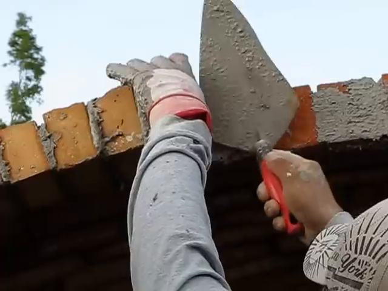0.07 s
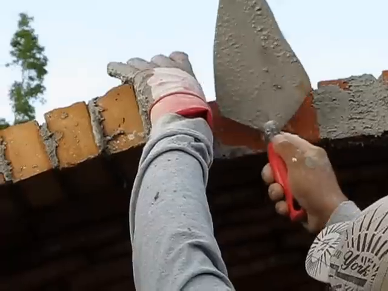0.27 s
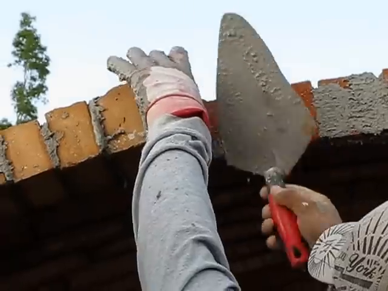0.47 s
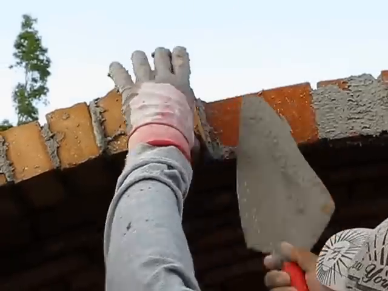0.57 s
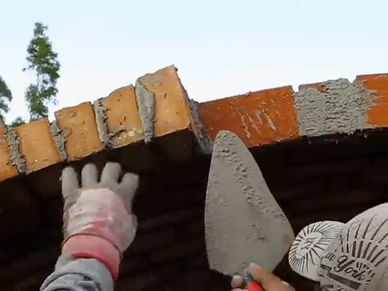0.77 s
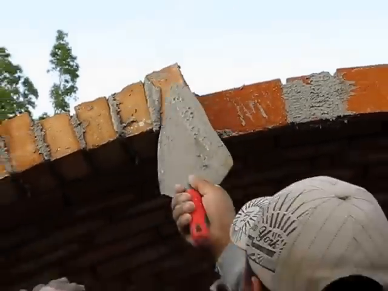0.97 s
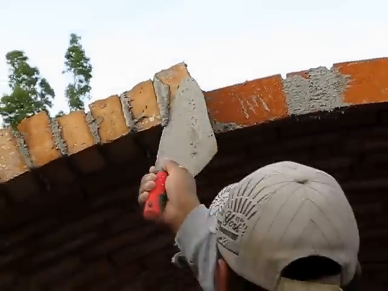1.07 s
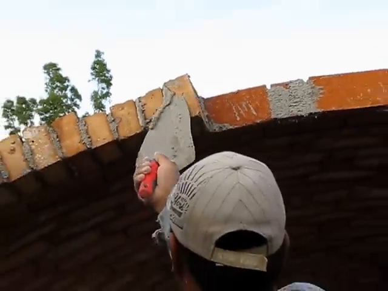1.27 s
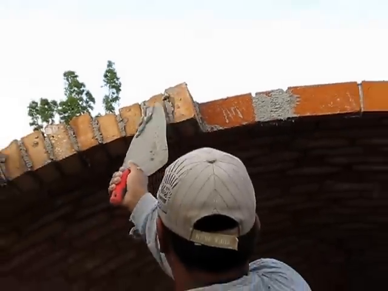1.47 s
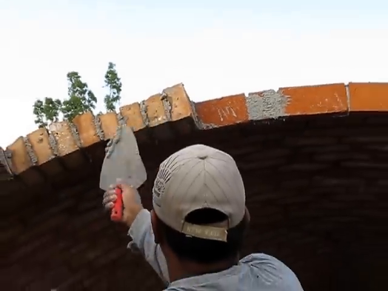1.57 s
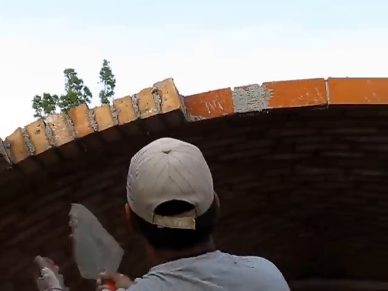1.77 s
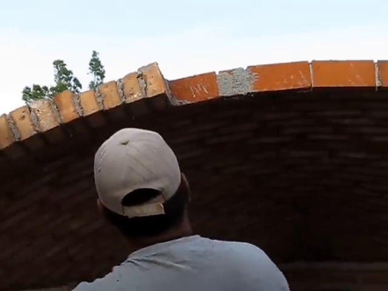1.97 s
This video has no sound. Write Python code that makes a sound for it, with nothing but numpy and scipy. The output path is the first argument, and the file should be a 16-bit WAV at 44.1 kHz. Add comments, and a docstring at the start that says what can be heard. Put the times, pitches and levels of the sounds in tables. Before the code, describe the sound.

Steel trowel knocks a brick with ringing clinks, then scrapes gritty mortar off the masonry edge

```python
"""Trowel and brick under a vault

A bricklayer knocks a brick home with a steel trowel at the rim of a brick vault, then scrapes the joint clean.
Blows are shaped noise bands over booming masonry modes; the blade is a bank of resonators, struck and rubbed.
Dense random clicks make the sand rasp and the patter of mortar; rough tones squeal, noise bursts tick and bump.
Distant site noise, a swelling hum and a thin whine lie behind."""
import sys
import numpy as np
from scipy import signal
from scipy.io import wavfile

SR = 44100
rng = np.random.default_rng(int(sys.argv[2]) if len(sys.argv) > 2 else 0)


def unload_wav(signal):
    """Save mono or channel-first audio to the path in sys.argv[1] as 16-bit WAV at rate SR, clipped to [-1, 1]."""
    wavfile.write(
        sys.argv[1],
        SR,
        np.round(np.clip(np.atleast_2d(signal).T, -1, 1) * 32767).astype(np.int16),
    )


N = 88464
T = np.arange(N) / SR
EDGES_HZ = np.geomspace(25, 17500, 25)
CENTRES_HZ = np.sqrt(EDGES_HZ[1:] * EDGES_HZ[:-1])


def amp(db):
    """Decibels to amplitude ratio."""
    return 10 ** (np.asarray(db) / 20)


def rms_one(x):
    """Scale to rms 1 over all channels."""
    return x / np.sqrt(np.mean(x ** 2) + 1e-20)


def at_hz(points, hz):
    """Read a (f/Hz, value) table, linear in log frequency."""
    points = np.array(points)
    return np.interp(np.log(hz), np.log(points[:, 0]), points[:, 1])


def in_time(points):
    """Read a (t/s, value) table at every sample."""
    return np.interp(T, *np.transpose(points))


def pan(db):
    """Stereo gains with the left db above the right."""
    return amp(np.array([[.5], [-.5]]) * db)


def fade(start_s, t60_s):
    """Zero before the start, then an exponential decay."""
    return (T >= start_s) * amp(-60 * np.clip((T - start_s) / t60_s, 0, 4))


def drift(knots_per_s):
    """Smooth random curve of rms 1."""
    knots = rng.standard_normal(int(N / SR * knots_per_s) + 2)
    return rms_one(np.interp(T * knots_per_s, np.arange(len(knots)), knots))


def grains(per_s, spread_db, size=(2, 2, N)):
    """Random clicks of uneven size and either sign; rms 1."""
    sizes = amp(spread_db * np.minimum(rng.exponential(1, size), 5))
    sizes = sizes * rng.choice([-1, 1], size)
    return rms_one(sizes * (rng.random(size) < per_s / SR))


# stereo width: f/Hz, side minus mid/dB
WIDTH = [(60, -25), (250, -20.5), (500, -15.5), (1000, -10), (2000, -7), (4000, -2), (12000, -0.5)]
# stereo balance: f/Hz, left minus right/dB
LEAN = [(60, -1.5), (300, -1.5), (1100, -2), (2000, -3), (4000, 3.5), (8000, -3), (14000, -2.5)]


def bands(source):
    """Split four streams into stereo bands of unit power per Hz, wider towards the treble."""
    out = []
    for k, hz in enumerate(CENTRES_HZ):
        band_pass = signal.butter(2, EDGES_HZ[k:k + 2], "band", fs=SR, output="sos")
        # neighbouring bands use different pairs of streams
        mid, side = signal.sosfilt(band_pass, source[k % 2] + 1e-18)
        width = amp(at_hz(WIDTH, hz))
        stereo = mid + width * side * [[1], [-1]]
        out.append(stereo * pan(at_hz(LEAN, hz)) * np.sqrt(SR / 2 / (1 + width ** 2)))
    return np.array(out)


def noise_bands():
    """White noise split into stereo bands."""
    return bands(rng.standard_normal((2, 2, N)))


def colour(split, spectrum):
    """Mix bands to a spectrum; rms 1."""
    return rms_one(np.tensordot(amp(at_hz(spectrum, CENTRES_HZ)), split, 1))


def ring(drive, hz, t60_s):
    """Two-pole resonator: a unit click sets a tone of height 1 ringing."""
    radius, step_rad = amp(-60 / (t60_s * SR)), 2 * np.pi * hz / SR
    poles = [1, -2 * radius * np.cos(step_rad), radius * radius]
    return signal.lfilter([.5, 0, -.5], poles, drive + 1e-18)


def decaying(impulses, t60_s):
    """One-pole smoother: each impulse dies away exponentially."""
    return signal.lfilter([1], [1, -amp(-60 / (t60_s * SR))], impulses + 1e-18)


def clicks(times_s, db):
    """Single-sample clicks at the given times."""
    out = np.zeros(N)
    out[(times_s * SR).astype(int)] = amp(db)
    return out


def place(tone, hz):
    """A tone reaches the two microphones out of step, by a phase that grows with its pitch."""
    phase_rad = 2 * np.arctan(amp(at_hz(WIDTH, hz)))
    lag = int(phase_rad / (2 * np.pi * hz) * SR + .5)
    return np.array([tone, np.pad(tone, (lag, 0))[:N]]) * pan(at_hz(LEAN, hz))


# blows: t/s, blade ring level/dB, share on blade edge 0-1, then relative knock level/dB per Hz at each KNOCK_HZ
BLOWS = [(0.094, -18.5, 0.97, -55, -51, -56.5, -57, -76, -63.5, -95, -90),
         (0.3823, -15.5, 0.29, -54.5, -53.5, -52, -52.5, -65.5, -74.5, -80.5, -106),
         (0.589, -34, .2, -74, -70, -62, -59.5, -67, -72, -99, -110),
         (0.619, -38, 0.33, -54, -43.5, -47.5, -52.5, -53.5, -61, -75.5, -95)]
# frequencies of the knock levels: f/Hz
KNOCK_HZ = [170, 400, 750, 1200, 2100, 4000, 7000, 13000]
# vault reverberation: f/Hz, t60/s
VAULT_T60 = [(100, 0.45), (260, 0.66), (700, 0.39), (1840, 0.32), (4850, 0.13), (12000, 0.14)]
KNOCK_LOW_HZ, KNOCK_TOP_HZ = 140, 14000   # the knock falls away outside these
KNOCK_ATTACK_S, KNOCK_RISE_CYCLES, KNOCK_T60_S = .001, 1.8, 0.28
TAIL_DB, CRACK_DB, CRACK_T60_S = 2.5, 12, 0.024
KNOCK_GRIT_DB, KNOCK_GRIT_PER_S = 0.5, 330   # mortar crumbles unevenly under the blow


def knocks():
    """Each blow: short crack, dense knock and vault tail, summed as power in each noise band."""
    out = np.zeros((2, N))
    for hz, noise in zip(CENTRES_HZ, noise_bands()):
        crack = amp(CRACK_DB) * fade(0, CRACK_T60_S) * hz / (hz + 3000)
        tail = amp(TAIL_DB) * fade(0, at_hz(VAULT_T60, hz))
        power = fade(0, KNOCK_T60_S) ** 2 + tail ** 2 + crack ** 2
        power *= np.minimum(T / (KNOCK_ATTACK_S + KNOCK_RISE_CYCLES / max(hz, 400)), 1)
        power /= (1 + (KNOCK_LOW_HZ / hz) ** 4) * (1 + (hz / KNOCK_TOP_HZ) ** 4)
        total = np.zeros(N)
        for t_s, _, _, *levels_db in BLOWS:
            start = int(t_s * SR)
            level_db = np.interp(np.log(hz), np.log(KNOCK_HZ), levels_db)
            total[start:] += power[:N - start] * amp(level_db) ** 2
        out += noise * np.sqrt(total)
    return out * amp(KNOCK_GRIT_DB * drift(KNOCK_GRIT_PER_S))


# low masonry and vault modes: f/Hz, level re the blow's lowest knock level/dB, t60/s
VAULT_MODES = [(138, 14, 3.2), (211, 22, 1.13), (277.3, 25.5, 0.72), (301.6, 24, 0.79), (380.2, 22, .45),
               (482, 14, 0.32), (538, 0, 0.25), (576, 22, .5), (645, 10, 0.22)]


def vault():
    """The weight of each blow sets the low resonances booming."""
    t_s, _, _, weight_db = np.transpose(BLOWS)[:4]
    return sum(place(ring(clicks(t_s, weight_db + db), hz, t60_s), hz) for hz, db, t60_s in VAULT_MODES)


# grinding force of blade on brick: t/s, relative level/dB
GRIND = [(0.51, -50), (0.56, -34.5), (0.61, -33), (0.7, -43.5), (0.81, -36), (0.84, -49), (0.982, -64.5),
         (0.993, -26.5), (1.04, -28), (1.078, -26.5), (1.12, -35), (1.21, -28.5), (1.3, -29.5),
         (1.355, -34.5), (1.45, -23.5), (1.5, -31.5), (1.595, -25.5), (1.66, -35), (1.73, -44.5),
         (1.89, -43), (1.94, -37), (2.0, -39.5)]


def grinding():
    """Force envelope of the scrape, shared by steel and sand; zero before its first point."""
    return amp(in_time(GRIND)) * (T > GRIND[0][0])


SNAGS_PER_S, SNAG_SPREAD_DB = 120, 1.1   # grains that pluck any one mode
CONTACT_WAVER_DB, CONTACT_WAVER_PER_S = 5.5, 22   # the moving contact favours one mode, then another


def rubbing(grind, t60_s):
    """Sand grains pluck a mode at random; the moving contact now and then mutes it."""
    contact = grind * amp(CONTACT_WAVER_DB * np.minimum(drift(CONTACT_WAVER_PER_S), .5))
    # offset the power that longer rings accumulate
    gain = np.sqrt(2 * np.log(1e6) / (t60_s * SR))
    return grains(SNAGS_PER_S, SNAG_SPREAD_DB, size=N) * contact * gain


# trowel modes: f/Hz, relative level/dB struck on edge, struck on heel, scraped; t60/s
BLADE = [(878, -1.5, -5, -11.5, 0.17), (937, -12.5, -11, -8.5, 0.32), (1118, -4.5, 0, -6, 0.4),
         (1223, 10, -8, -13, 0.054), (1313, 0.5, -24, -27, 0.22), (1374, -6, -20, -9.5, 0.4),
         (1850, -7.5, -39, -8, 0.1), (1980, -23, -16, -9, 0.14), (2465, -9, -13.5, -11.5, 0.12),
         (3016, -9, -10, -24, 0.067), (3100, -9.5, -66, -7.5, 0.21), (3490, -2.5, -70, -12, 0.04),
         (3873, -0.5, -26, -9, 0.073), (6150, -38, -59, -28, .15), (7080, -37, -17, -23, 0.072),
         (8900, -9, -43, -19.5, 0.032)]
# blade catches on the brick edge: t/s, click level/dB, relative ring level/dB
CATCHES = [(0.993, -46, -27.5), (1.052, -44, -30), (1.078, -27.5, -56), (1.137, -27, -60),
           (1.447, -35, -30), (1.518, -28, -25.5), (1.646, -29.5, -30.5)]
GRIND_RING_DB = -9.5
RING_BUILD_S = 0.002   # the ring swells as the nearest walls answer
PRESSED_T60_SHARE = .45   # pressed against the brick, the blade rings for less time


def blade(grind):
    """Steel modes ring from blows, catches and the sand passing under the blade."""
    t_s, ring_db, edge = np.transpose(BLOWS)[:3]
    catch_s, _, catch_db = np.transpose(CATCHES)
    edge, out = np.clip(edge, 0, 1), 0
    for hz, edge_db, heel_db, scraped_db, t60_s in BLADE:
        struck = clicks(t_s, ring_db + edge * edge_db + (1 - edge) * heel_db)
        struck = ring(struck, hz, RING_BUILD_S * np.log(1000)) * 2 / (RING_BUILD_S * SR)
        pressed_t60_s = t60_s * PRESSED_T60_SHARE
        rubbed = rubbing(grind, pressed_t60_s) * amp(GRIND_RING_DB + scraped_db)
        rubbed = rubbed + clicks(catch_s, catch_db + scraped_db)
        out = out + place(ring(struck, hz, t60_s) + ring(rubbed, hz, pressed_t60_s), hz)
    return out


# scrape treble against its body: t/s, relative level/dB
TREBLE = [(0.55, -17), (0.8, -24), (0.87, 9), (1.0, 3), (1.14, 0.5), (1.25, 3), (1.4, -9.5), (1.6, 3),
          (1.72, -14), (1.93, 8), (2.0, 12.5)]
UPPER_LOW_HZ, UPPER_TOP_HZ, UPPER_T60_S = 2610, 13400, 0.13
UPPER_STRUCK_DB, UPPER_HEEL_DB, UPPER_RUBBED_DB, UPPER_CAUGHT_DB = -17.5, -23, -22.5, -13.5
UPPER_TILT_DB_PER_OCT = -7


def shimmer(grind, count=56):
    """Randomly scattered upper blade modes, with random levels at each microphone."""
    t_s, ring_db, edge = np.transpose(BLOWS)[:3]
    catch_s, _, catch_db = np.transpose(CATCHES)
    hits = clicks(t_s, ring_db + UPPER_STRUCK_DB + (1 - edge) * UPPER_HEEL_DB)
    hits = hits + clicks(catch_s, catch_db + UPPER_CAUGHT_DB)
    bright_grind = grind * amp(in_time(TREBLE))
    out = 0
    for hz in np.linspace(UPPER_LOW_HZ, UPPER_TOP_HZ, count) + rng.normal(0, 70.7, count):
        rubbed = rubbing(bright_grind, UPPER_T60_S) * amp(UPPER_RUBBED_DB)
        level_db = UPPER_TILT_DB_PER_OCT * np.log2(hz / UPPER_LOW_HZ) + rng.normal(0, 1.4, (2, 1))
        out = out + place(ring(hits + rubbed, hz, UPPER_T60_S), hz) * amp(level_db)
    return out


SQUEAL_ATTACK_S, SQUEAL_T60_S = 0.0078, .2


def rough_tone(t_s, length_s, db, hz, sag_hz_per_s, pan_db, width_hz):
    """A randomly modulated tone that sags in pitch for up to 0.15 s and dies away after its length."""
    phase = 2 * np.pi * np.cumsum(hz - sag_hz_per_s * np.clip(T - t_s, 0, .15)) / SR
    tone = rms_one(drift(width_hz) * np.cos(phase) + drift(width_hz) * np.sin(phase))
    held = np.clip((T - t_s) / SQUEAL_ATTACK_S, 0, 1) * (T < t_s + length_s)
    envelope = held + fade(t_s + length_s, SQUEAL_T60_S)
    return place(tone * envelope * amp(db), hz) * pan(pan_db - at_hz(LEAN, hz))


# squeals: t/s, length/s, level/dB, start f/Hz, sag/Hz per s, pan/dB
SQUEALS = [(1.046, 0.011, -26, 3900, 503, 4), (1.073, 0.0093, -30, 3880, 1002, 7),
           (1.213, 0.0067, -31, 4100, 964, 5), (1.432, 0.0071, -30.5, 4450, 997, 6),
           (1.518, .008, -32, 2500, 0, -4), (1.58, 0.028, -38, 3000, 0, -5),
           (1.638, 0.013, -27.5, 3800, 2000, 4.5), (1.95, 0.014, -40, 4480, 0, 2)]


def squeals():
    """The blade sticks and slips in short rough squeals."""
    return sum(rough_tone(*row, width_hz=520) for row in SQUEALS)


STUTTER_DB, STUTTER_PER_S, STUTTER_T60_S = -10.5, 28, 0.016


def stutter():
    """The blade jumps from grain to grain: sudden pressure surges that die quickly; rms 1."""
    jumps = (rng.random(N) < STUTTER_PER_S / SR) * rng.random(N)
    return rms_one(1 + amp(STUTTER_DB) * rms_one(decaying(jumps, STUTTER_T60_S)))


# rasp colour: f/Hz, relative level/dB per Hz
GRIND_SPECTRUM = [(300, -32), (700, -6), (1100, -1), (1600, -6.5), (2500, -2), (4000, -2.5), (6500, -2.5),
                  (10000, -10.5), (15500, -16.5)]
GRIND_DB, GRIND_FLUTTER_DB, GRAINS_PER_S, GRAIN_SPREAD_DB = -6, 1, 7000, 3.2
# big grains crushed under the blade
COARSE_PER_S, COARSE_SPREAD_DB, COARSE_DB, COARSE_T60_S = 150, -1, -7.5, 0.008
TREBLE_FROM_HZ, RASP_PATCHY_DB, CATCH_T60_S = 6500, 2.0, 0.14


def rasp(grind):
    """Fine and coarse sand cracks under the juddering blade, bursts at catches; colour shifts with contact."""
    crush = decaying(np.abs(grains(COARSE_PER_S, COARSE_SPREAD_DB, size=N)), COARSE_T60_S)
    coarse = amp(COARSE_DB) * rms_one(crush) * rng.standard_normal((2, 2, N))
    split = bands(grains(GRAINS_PER_S, GRAIN_SPREAD_DB) + coarse)
    split[CENTRES_HZ > TREBLE_FROM_HZ] *= amp(in_time(TREBLE))
    split *= np.array([[amp(RASP_PATCHY_DB * drift(70))] for _ in CENTRES_HZ])
    bursts = sum(amp(db) * fade(t_s, CATCH_T60_S) for t_s, db, _ in CATCHES)
    pressure = amp(GRIND_DB + GRIND_FLUTTER_DB * drift(150)) * grind * stutter()
    return colour(split, GRIND_SPECTRUM) * np.hypot(pressure, bursts)


# mortar showers: t/s, length/s, patter level/dB, thud level/dB
SHOWERS = [(0.694, .03, -34.5, -59), (0.838, 0.034, -24.5, -38), (1.052, 0.076, -40, -36.5),
           (1.352, 0.056, -25.5, -30.5), (1.436, 0.035, -33, -35.5), (1.52, 0.043, -37, -56),
           (1.582, 0.093, -33, -41.5), (1.96, 0.036, -34.5, -36)]
# patter colour: f/Hz, relative level/dB per Hz
PATTER = [(150, -11), (400, -3.5), (1000, 5), (2200, 2), (4200, -6), (7000, -18), (15000, -34)]
# thud colour: f/Hz, relative level/dB per Hz
THUD = [(50, -11), (130, -11), (250, -0.5), (450, -6.5), (900, -22), (4000, -53)]
SHOWER_ATTACK_S, SHOWER_T60_S, THUD_T60_S = 0.035, .3, 0.82
CRUMBS_PER_S, CRUMB_SPREAD_DB = 5000, 2


def mortar():
    """Loose mortar lands as a patter of crumbs over a soft thud that lingers in the vault."""
    patter = colour(bands(grains(CRUMBS_PER_S, CRUMB_SPREAD_DB)), PATTER)
    thud = colour(noise_bands(), THUD)
    patter_power, thud_power = 0, 0
    for t_s, length_s, patter_db, thud_db in SHOWERS:
        end_s = t_s + length_s
        held = np.clip((T - t_s) / SHOWER_ATTACK_S, 0, 1) * (T < end_s)
        patter_power += amp(patter_db) ** 2 * (held + fade(end_s, SHOWER_T60_S) ** 2)
        thud_power += amp(thud_db) ** 2 * (held + fade(end_s, THUD_T60_S) ** 2)
    return patter * np.sqrt(patter_power) + thud * np.sqrt(thud_power)


TICK_CYCLES = 42.5   # length to -60 dB
TICK_WIDTH = .25   # bandwidth over centre


def small_contacts(rows):
    """Each small contact is a short noise burst in one broad resonance."""
    out = 0
    for t_s, db, hz, pan_db in rows:
        resonance_t60_s = np.log(1000) / (np.pi * TICK_WIDTH * hz)
        mid, side = rms_one(ring(rng.standard_normal((2, N)), hz, resonance_t60_s))
        stereo = mid + amp(at_hz(WIDTH, hz)) * side * [[1], [-1]]
        out = out + stereo * amp(db) * fade(t_s, TICK_CYCLES / hz) * pan(pan_db)
    return out


# dull bumps: t/s, level/dB, centre f/Hz, pan/dB
BUMPS = [(0.868, -28, 170, -1), (1.066, -32, 302, -2), (1.705, -35.5, 295, -1.8), (1.925, -39, 148, -1)]


def bumps():
    """Dull bumps against the masonry: low resonant bursts."""
    return small_contacts(BUMPS)


# single crumbs and taps: t/s, level/dB, centre f/Hz, pan/dB
TICKS = [(0.196, -29.5, 4260, 0), (0.466, -46, 3160, 5), (0.5135, -36, 3900, -9), (0.592, -26.5, 950, 2),
         (0.603, -30, 880, -5), (0.718, -40, 2000, 6), (0.782, -43, 4167, 9), (0.842, -41, 2600, 1),
         (1.518, -19, 3600, 1), (1.614, -25, 1070, -8), (1.647, -21, 3150, -1), (1.755, -34.5, 1360, 10),
         (1.788, -35, 3900, 9), (1.7885, -33.5, 1110, -4), (1.813, -34, 4800, 14), (1.862, -39.5, 2800, 5),
         (1.889, -26, 2240, 8), (1.8893, -38, 6000, 1)]


def ticks():
    """Single crumbs and taps nearby: short resonant bursts."""
    return small_contacts(TICKS)


# faint swish: t/s, length/s, level/dB, start f/Hz, sag/Hz per s, pan/dB
FAR_SWISH = (0.205, .075, -53, 4050, 6000, 3)


def far_swish():
    """A faint falling swish: a very rough sagging tone."""
    return rough_tone(*FAR_SWISH, width_hz=1500)


# site noise colour: f/Hz, relative level/dB per Hz
AIR = [(25, -27), (60, -11), (114, -3), (200, 1.5), (300, -2.5), (500, -11.5), (800, -15.5), (1130, -17.5),
       (1700, -28), (3700, -28), (7000, -40), (12900, -42.5), (16000, -54)]
# site noise swell: t/s, level re AIR_DB/dB
AIR_SWELL = [(0.1, 8.5), (0.3, -6), (0.55, 0.5), (0.8, -3.5), (1.2, -3), (1.62, -3), (1.76, 5), (1.87, 0.5),
             (2.0, -4)]
# hum swell: t/s, level/dB
RUMBLE = [(0.1, -56), (0.78, -47), (0.87, -42), (1.02, -44), (1.15, -51), (1.55, -58), (1.65, -46.5),
          (2.0, -56)]
AIR_DB, AIR_START_S, RUMBLE_HZ = -41, 0.0857, 52
WHINE_HZ, WHINE_DB, WHINE_T60_S = 7900, -69.5, 0.083


def background():
    """Far site noise in coloured bands, a swelling low hum and a thin whine of resonated noise."""
    air = amp(AIR_DB + in_time(AIR_SWELL)) * colour(noise_bands(), AIR)
    hum = amp(in_time(RUMBLE)) * rms_one(np.sin(2 * np.pi * RUMBLE_HZ * T + .5 * drift(8)))
    whine = amp(WHINE_DB) * rms_one(ring(rng.standard_normal((2, N)), WHINE_HZ, WHINE_T60_S))
    fade_in = np.clip((T - AIR_START_S) / 0.0055, 0, 1)
    return (air + place(hum, RUMBLE_HZ) + whine) * fade_in


def scene():
    """Blows, steel, sand, falling mortar and the site around them."""
    grind = grinding()
    masonry = knocks() + vault() + bumps()
    steel = blade(grind) + shimmer(grind) + squeals()
    debris = rasp(grind) + mortar() + ticks()
    return masonry + steel + debris + far_swish() + background()


LOW_CUT_HZ, TOP_CUT_HZ = 44, 16000


def record(dry):
    """The deepest bass and the top are cut."""
    low_cut = signal.butter(3, LOW_CUT_HZ, "high", fs=SR, output="sos")
    top_cut = signal.ellip(10, .3, 80, TOP_CUT_HZ, fs=SR, output="sos")
    return signal.sosfilt(top_cut, signal.sosfilt(low_cut, dry))


dry = scene()
out = record(dry)
unload_wav(out)
```